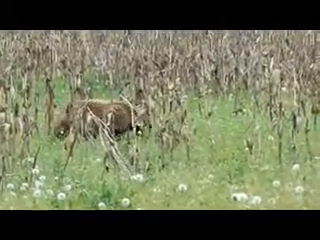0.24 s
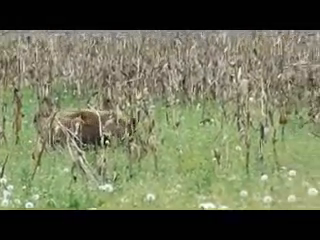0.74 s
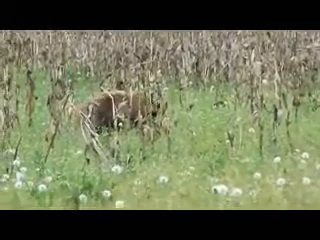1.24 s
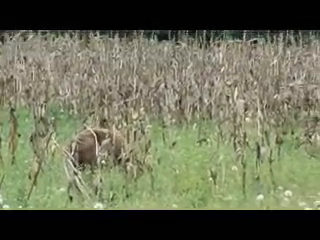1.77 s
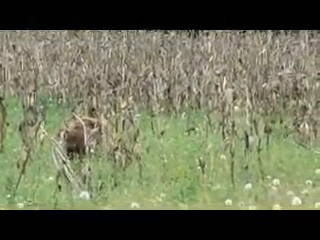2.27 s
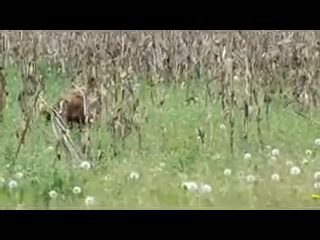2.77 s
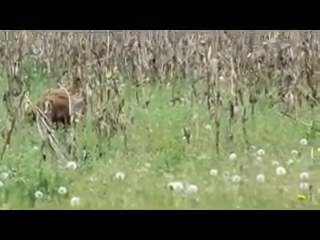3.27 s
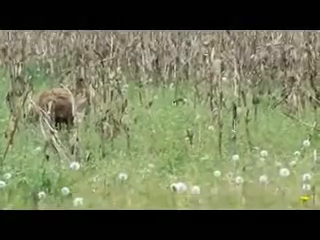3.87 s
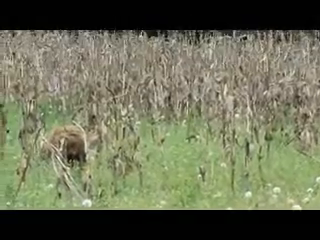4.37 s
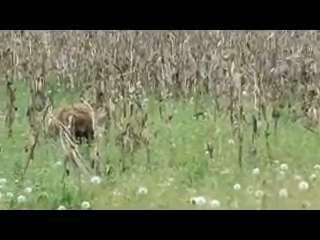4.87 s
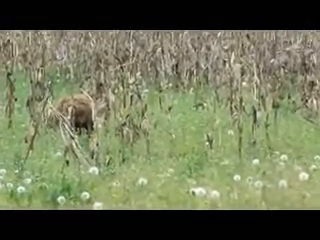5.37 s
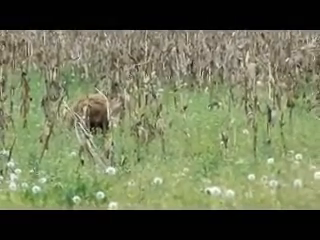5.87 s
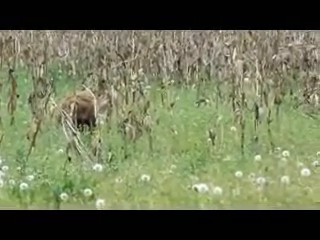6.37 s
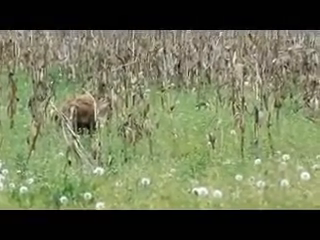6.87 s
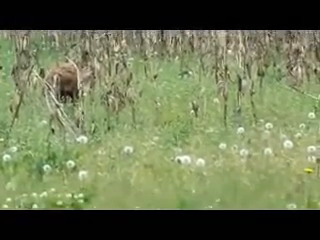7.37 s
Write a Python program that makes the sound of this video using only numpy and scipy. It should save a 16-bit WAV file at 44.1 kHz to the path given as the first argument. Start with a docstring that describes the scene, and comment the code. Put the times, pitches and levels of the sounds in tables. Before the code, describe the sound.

A cricket chirps close by in a field over the low drone of distant engines, with wind thumping the microphone and faint birds.

```python
"""Two distant engines drone, their low exhaust orders beating against each other, and close by a
field cricket chirps in the grass of a harvested field: four wing strokes to a chirp, each drawing
a scraper over a file. Small birds whistle and twitter faintly. Wind rumbles and its eddies thump
on the two microphone ports, over a soft wash of moving air and the hiss of dry leaves."""
import sys
import numpy as np
from scipy import signal
from scipy.fft import rfft, irfft, next_fast_len
from scipy.io import wavfile
from scipy.ndimage import map_coordinates

SR = 44100
rng = np.random.default_rng(int(sys.argv[2]) if len(sys.argv) > 2 else 0)


def int16_out(signal):
    """Quantize to a 16-bit WAV file."""
    q = np.round(np.clip(np.atleast_2d(signal).T, -1, 1) * 32767)
    wavfile.write(sys.argv[1], SR, q.astype(np.int16))


N = 336042


def amp(db):
    """Decibels to gain."""
    return 10 ** (np.asarray(db) / 20)


def along(points, hz):
    """Read (Hz, value) points on a log frequency axis."""
    point_hz, values = np.transpose(points)
    return np.interp(np.log(hz + 1e-9), np.log(point_hz), values)


def automation(points):
    """Join (seconds, value) points into one value per sample."""
    times, values = np.transpose(points)
    return np.interp(np.arange(N) / SR, times, values)


def wobble(rate_hz):
    """A smooth random curve with rate_hz knots a second."""
    position = np.arange(N) * rate_hz / SR
    knots = rng.standard_normal(int(position[-1]) + 4)
    coarse = position[::16]
    return np.interp(position, coarse, map_coordinates(knots, [coarse]))


def glide(hz):
    """A sine that follows a pitch curve."""
    return np.sin(2 * np.pi * np.cumsum(hz) / SR)


def filtered(x, response):
    """Zero-phase EQ; response gives the gain at each frequency."""
    n = x.shape[-1]
    padded = next_fast_len(n + 8192)
    return irfft(rfft(x, padded) * response(np.fft.rfftfreq(padded, 1 / SR)), padded)[..., :n]


def stereo_noise(spectrum, correlation):
    """Noise of rms 1 with a given colour and left-right correlation."""
    def mid_side_gains(hz):
        angle = np.arccos(np.clip(along(correlation, hz), -1, 1)) / 2
        return amp(along(spectrum, hz)) * [np.cos(angle), np.sin(angle)]
    mid, side = filtered(rng.standard_normal((2, N)), mid_side_gains)
    noise = np.array([mid + side, mid - side])
    return noise / np.sqrt(np.mean(noise ** 2) + 1e-20)


def stalk_scatter(x, t60_s, wet_db):
    """Dry stalks scatter a short, weak tail after a sound."""
    t = np.arange(SR // 3) / SR
    tail = rng.standard_normal(len(t)) * amp(-60 * t / t60_s)
    return x + amp(wet_db) * signal.fftconvolve(x, tail / np.linalg.norm(tail))[:N]


# Colour of the air and of the leaves: frequency_hz, gain_db
AIR_EQ = [(60, -9.5), (200, 10.5), (300, 1), (420, -1.5), (700, -.5), (1000, 0), (1400, -1), (2000, -5),
          (3000, -8.5), (5000, -13.5), (7000, -21), (12000, -45)]
LEAF_EQ = [(1000, -20), (3000, -3), (5000, -6.5), (7000, 0.5), (9000, 1.5), (11500, -1)]
# Fader rides; the leaves come up toward the end: time_s, level_db
AIR_FADER = [(0, -39.5), (3.7, -41), (6, -39), (7.62, -39.6)]
LEAF_FADER = [(0, -57.5), (3.7, -58), (7.62, -55)]
# Stereo image of both: frequency_hz, correlation
BED_IMAGE = [(100, .45), (250, 0.88), (600, 0.74), (1200, 0.58), (2500, 0.13), (3600, 0.29), (5000, 1),
             (11000, 1)]


def air_and_leaves(leaf_trim_db=4.5, swell_db=0.66):
    """A far wash of moving air and the fine hiss of dry leaves, each swelling gently."""
    air = amp(automation(AIR_FADER) + swell_db * wobble(5)) * stereo_noise(AIR_EQ, BED_IMAGE)
    leaf_db = automation(LEAF_FADER) + leaf_trim_db + swell_db * wobble(7.5) / 2
    return air + amp(leaf_db) * stereo_noise(LEAF_EQ, BED_IMAGE)


# Rising whistles: start_s, length_s, from_hz, to_hz, level_db
WHISTLE_CUES = [(.28, .4, 3370, 4020, -54), (0.498, .13, 2820, 2950, -53), (.91, .15, 3480, 4000, -54),
                (4.55, .05, 6250, 6550, -53), (4.71, .05, 6300, 6720, -46), (5.918, .09, 3380, 3720, -52),
                (7.44, .13, 2760, 3030, -53.5), (7.46, .1, 3670, 4080, -54)]
# One swoop, a high hook, a dive and a climb: time_s, pitch_hz, level_db
SWOOP_SHAPE = [(0, 5890, -11), (.03, 6400, 3), (.043, 6100, -5), (.055, 5100, -5), (.072, 4295, 0),
               (.102, 3300, -7.5), (.125, 4450, -3), (.148, 5200, -9)]
# The swoops of the song: start_s, level_db
SWOOP_CUES = [(4.9, -51), (5.146, -46), (5.328, -44.5), (5.515, -46.5), (5.75, -49), (6.135, -52)]


def birds(trim_db=-2, waver_db=3):
    """Far birds: thin rising whistles, and one song of repeated swoops."""
    song = np.zeros(N)
    for start_s, length_s, from_hz, to_hz, level_db in WHISTLE_CUES:
        progress = np.linspace(0, 1, round(length_s * SR))
        arch = np.sqrt(np.abs(np.sin(np.pi * progress)))
        add(song, start_s, amp(level_db) * arch * glide(from_hz + (to_hz - from_hz) * progress))
    times, swoop_hz, swoop_db = np.transpose(SWOOP_SHAPE)
    t = np.arange(round(times[-1] * SR)) / SR
    swoop = amp(np.interp(t, times, swoop_db)) * glide(np.interp(t, times, swoop_hz))
    for start_s, level_db in SWOOP_CUES:
        add(song, start_s, amp(level_db) * swoop)
    return stalk_scatter(song * amp(trim_db + waver_db * wobble(70)), t60_s=0.23, wet_db=-5)


def add(track, start_s, sound):
    """Mix a sound into a track from start_s on."""
    start = max(round(start_s * SR), 0)
    part = track[..., start:start + sound.shape[-1]]
    part += sound[..., :part.shape[-1]]


# Colour of the wind rumble: frequency_hz, gain_db
RUMBLE_EQ = [(12, -11), (25, -1.5), (45, 2), (80, 2.5), (140, -4), (220, -13.5), (330, -25), (500, -34),
             (1000, -64), (3000, -120)]
# Bell-shaped gusts: centre_s, level_db, width_s, left_minus_right_db
GUST_CUES = [(.1, -31, 0.12, -3), (2.18, -23, .23, -9), (3.13, -22, 0.091, -4), (3.55, -22, 0.14, -6),
             (3.74, -22.5, .04, -17.5), (4, -21.5, .09, -5), (4.8, -30.5, 0.088, 5), (5.8, -20.5, .035, 1),
             (6.24, -25, .06, 9), (7.62, -27, 0.11, 6)]


def breeze(calm_db=-37.5, freshen_db_per_s=0.73, lumps_db=2):
    """Light wind rumbles in lumps; each gust swells and fades, stronger at the port that faces it."""
    t = np.arange(N) / SR
    power = amp(calm_db + freshen_db_per_s * t) ** 2
    for centre_s, level_db, width_s, pan_db in GUST_CUES:
        sides = amp(level_db + np.array([[pan_db], [-pan_db]]) / 2)
        power = power + sides ** 2 * np.exp(-((t - centre_s) / width_s) ** 2 / 2)
    lumps = amp(lumps_db * np.array([wobble(12), wobble(11)]))
    return np.sqrt(power) * lumps * stereo_noise(RUMBLE_EQ, correlation=[(30, .05), (200, 0.35)])


# Wind thumps: centre_s, level_db, width_s, eddy_hz, left_minus_right_db
PUFF_CUES = [(1.991, -10, 0.0065, 169, -14), (2.163, -9, 0.0069, 125, -17), (2.19, -10, .009, 180, -12),
             (2.212, -8.5, .0084, 165, -17), (2.311, -11.5, .007, 185, -17), (3.076, -9, .0045, 203, -12),
             (3.107, -7, 0.0042, 210, 7), (3.177, -6.5, .0058, 180, -10), (3.388, -13, 0.0059, 160, -15),
             (3.468, -1.5, 0.0048, 129, -20), (3.629, -0.5, 0.0048, 198, -20), (3.639, -1, .0073, 136, -20),
             (3.704, -8.5, .015, 137, -21), (3.871, 2, 0.0079, 120, 15), (3.888, .5, 0.011, 186, 5.5),
             (3.909, -0.5, 0.0083, 147, -18), (4.004, -10.5, 0.0046, 150, 14),
             (4.039, 2.5, 0.0094, 166, -25), (5.8, -8.5, 0.019, 110, -3)]
# Colour of the turbulence: multiple_of_eddy_pitch, gain_db
CHURN_EQ = [(.1, -10), (.4, -2.5), (1, -2), (1.5, -5.5), (2.5, -18), (4, -32.5), (7, -46.5), (14, -70),
            (40, -120)]
# Colour of the snap at an eddy's core: frequency_hz, gain_db
SNAP_EQ = [(20, -16), (120, -2.5), (300, -1.5), (550, -10.5), (900, -28.5), (1500, -54), (3000, -100)]


def puffs(trim_db=-3.0, turbulence=0.7, snap_db=3.0, tight_s=0.0041):
    """An eddy crosses a port: a few pressure swings, torn by turbulence, with suction at the core."""
    ports = np.zeros((2, N))
    t = np.arange(-SR // 10, SR // 10) / SR
    core = filtered((t == 0) * 1., lambda hz: amp(along(SNAP_EQ, hz)))
    suction = -amp(snap_db) * core / core.max()
    for centre_s, level_db, width_s, eddy_hz, pan_db in PUFF_CUES:
        snap = min(tight_s / width_s, 1) ** 1.26  # wider eddies snap less and churn more
        swell = np.exp(-(t / width_s) ** 2 / 2)
        noise = rng.standard_normal(len(t))
        churn = swell * filtered(noise, lambda hz: amp(along(CHURN_EQ, hz / eddy_hz)))
        churn *= np.linalg.norm(swell) / np.linalg.norm(churn)
        swing = -swell * np.cos(2 * np.pi * eddy_hz * t + rng.normal(0, .6))
        pressure = turbulence * (1 - snap / 2) * churn + 0.64 * swing + snap * suction
        sides = amp(np.minimum([[pan_db], [-pan_db]], 0))
        add(ports, centre_s + t[0], amp(level_db + trim_db) * sides * pressure)
    return ports


# One engine runs down, the other sags and picks up again: time_s, cycle_hz
SLOWING_SPEED = [(0, 24.25), (2.75, 22.28), (4.65, 21.13), (7.62, 20.65)]
SAGGING_SPEED = [(0, 30.78), (2.75, 29.46), (5, 28.0), (5.75, 28.05), (7.62, 29.5)]
# Both hold their load, then ease off: time_s, load_db
SLOWING_EFFORT = [(0, .7), (1.7, 1), (2.1, -4), (4.4, -9.5), (7.62, -12)]
SAGGING_EFFORT = [(0, 0.5), (4.6, 1.5), (6.6, -3)]
# Exhaust harmonics: multiple_of_cycle_rate, level_db, db_per_load_db
SLOWING_EXHAUST = [(2, -37, .5), (3, -40, .2), (4, -41, .4), (5, -19.7, 1), (6, -27.5, .9), (7, -39, .9),
                   (8, -47, .6), (10, -48, .8), (12, -51, .6)]
SAGGING_EXHAUST = [(2, -36, .3), (3, -45, -2.2), (4, -37, .9), (5, -29.5, .8), (6, -35, .9), (7, -48, .8),
                   (8, -47, .6), (10, -52, 0), (11, -55, .2)]


def engine(speed, load, exhaust, pan_db, flutter_db, drift_rad):
    """Only the low exhaust orders carry this far; moving air makes each one waver."""
    cycle_phase = 2 * np.pi * np.cumsum(automation(speed)) / SR
    load_db = automation(load)
    drone = np.zeros(N)
    for order, level_db, db_per_load_db in exhaust:
        phase = order * cycle_phase + rng.uniform(0, 2 * np.pi) + drift_rad * wobble(3.4)
        rms = amp(level_db + db_per_load_db * load_db + flutter_db * wobble(5))
        drone += np.sqrt(2) * rms * np.sin(phase)
    return drone * amp([[pan_db / 2], [-pan_db / 2]])


# Chirps, cued on their third wing stroke: time_s, level_db
CHIRP_CUES = [(.442, -32), (.890, -36), (2.178, -34), (2.575, -34), (2.873, -32), (3.195, -36),
              (3.516, -37), (3.750, -36), (3.978, -35.5), (4.449, -36.5), (4.684, -35.5), (4.908, -35),
              (5.311, -32.5), (5.525, -32.5), (5.772, -30.5), (6.125, -33.5), (6.412, -33), (6.628, -32.5),
              (6.890, -30), (7.092, -31), (7.392, -32.5), (7.635, -35.5)]
# The four strokes of a chirp: centre_offset_s, level_db, length_s, skipped_fraction
WING_STROKES = [(-.0565, -7, 0.0177, 0.51), (-.034, -3, .0225, 0), (-.001, -2, .0222, 0),
                (.035, -1.6, .0233, 0)]
# One stroke, the wing slowing as it closes: progress_fraction, pitch_hz, level_db
STROKE_SHAPE = [(0, 5680, -23), (.17, 5736, -10), (.38, 5720, -3.5), (.53, 5720, -1), (.65, 5645, -3),
                (.77, 5290, -7.5), (.89, 5050, -12.5), (1, 4780, -21)]


def cricket(trim_db=3, scatter_db=1.0, pitch_scatter=.0022, tooth_jitter=0.0043, rough_db=1.9):
    """Each wing closing draws the scraper over the file: a tone that swells, then drops in pitch."""
    song = np.zeros(N)
    marks, shape_hz, shape_db = np.transpose(STROKE_SHAPE)
    tooth_catch = wobble(700)  # the teeth catch a little unevenly
    for time_s, chirp_db in CHIRP_CUES:
        for offset_s, stroke_db, length_s, skipped in WING_STROKES:
            progress = np.linspace(skipped, 1, round(length_s * SR))
            strength, detune = rng.standard_normal(2)
            uneven = tooth_catch[rng.integers(N // 2):][:len(progress)]
            bend = 1 + pitch_scatter * detune + tooth_jitter * uneven
            pitch_hz = np.interp(progress, marks, shape_hz) * bend
            tone = amp(np.interp(progress, marks, shape_db)) * glide(pitch_hz)
            force = amp(chirp_db + stroke_db + scatter_db * strength)
            # A half stroke takes hold softly.
            grip = np.minimum((progress - skipped) / (0.061 + skipped / 2), 1)
            add(song, time_s + offset_s - length_s / 2, force * grip * tone)
    return stalk_scatter(song * amp(trim_db + rough_db * wobble(400)), t60_s=0.15, wet_db=-18.5)


def scene():
    """Cricket and birds in the centre, the engines far off, wind at the microphone."""
    slowing = engine(SLOWING_SPEED, SLOWING_EFFORT, SLOWING_EXHAUST,
                     pan_db=-1.1, flutter_db=0.8, drift_rad=0.062)
    sagging = engine(SAGGING_SPEED, SAGGING_EFFORT, SAGGING_EXHAUST,
                     pan_db=-1.0, flutter_db=0.6, drift_rad=0.15)
    return cricket() + birds() + slowing + sagging + puffs() + breeze() + air_and_leaves()


def record(dry):
    """The hardest puffs clip softly, then a steep low-pass takes off the top."""
    cutoff_hz = 11950
    clipped = dry / (1 + np.abs(dry) ** 8) ** (1 / 8)
    return filtered(clipped, lambda hz: 1 / np.sqrt(1 + (hz / cutoff_hz) ** 160))


dry = scene()
out = record(dry)
int16_out(out)
```